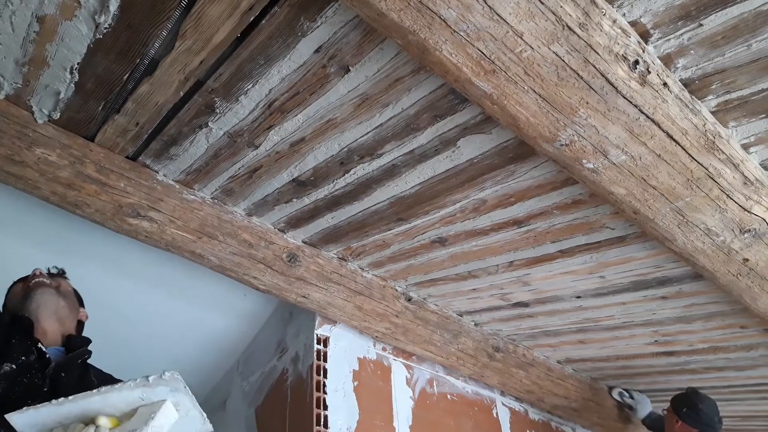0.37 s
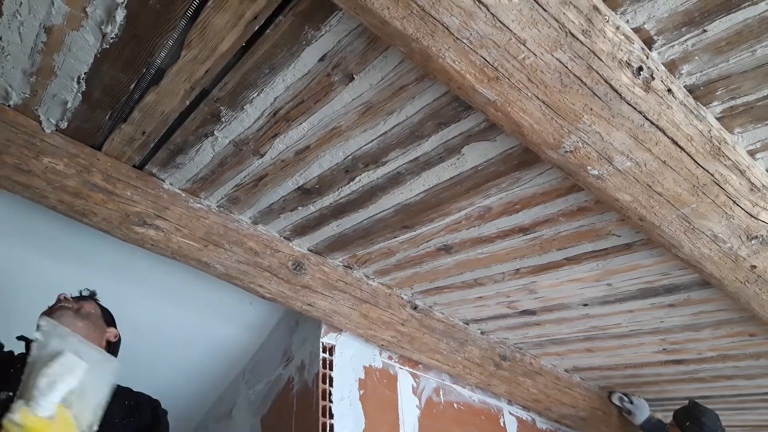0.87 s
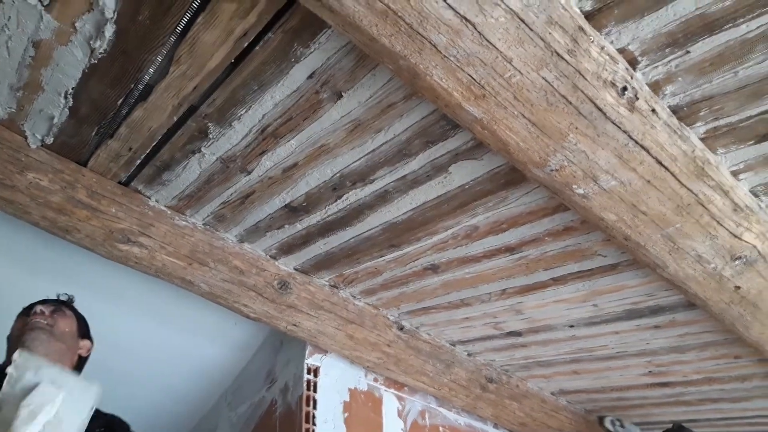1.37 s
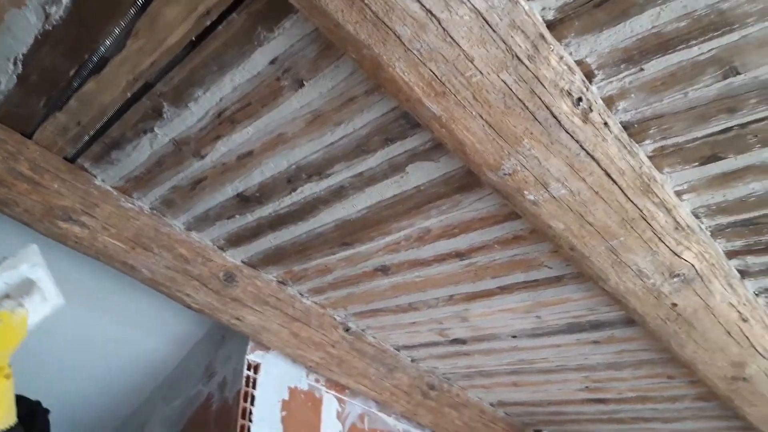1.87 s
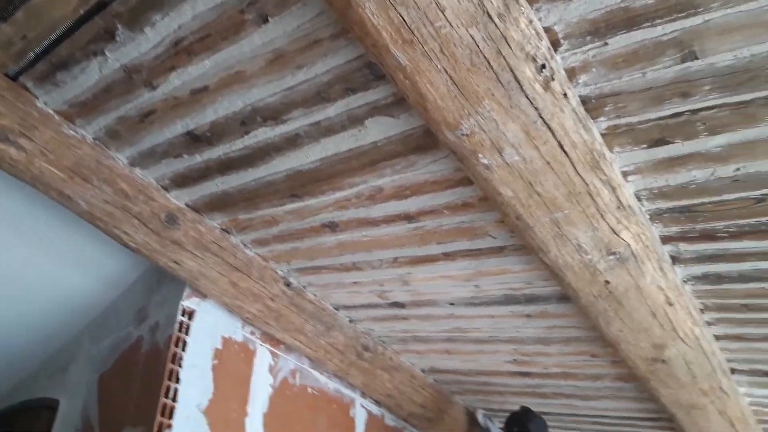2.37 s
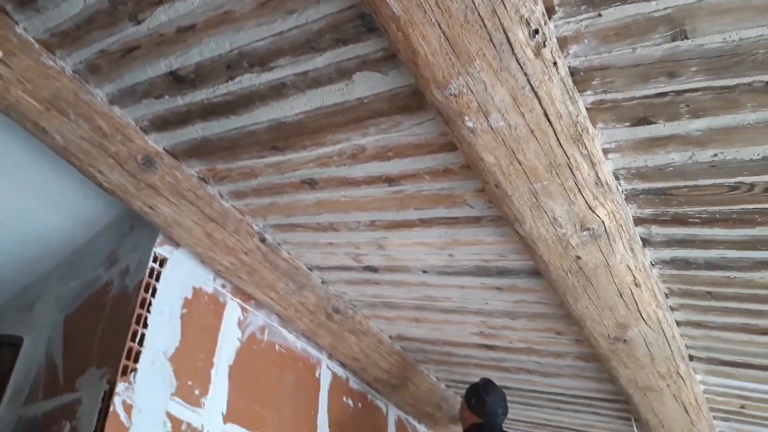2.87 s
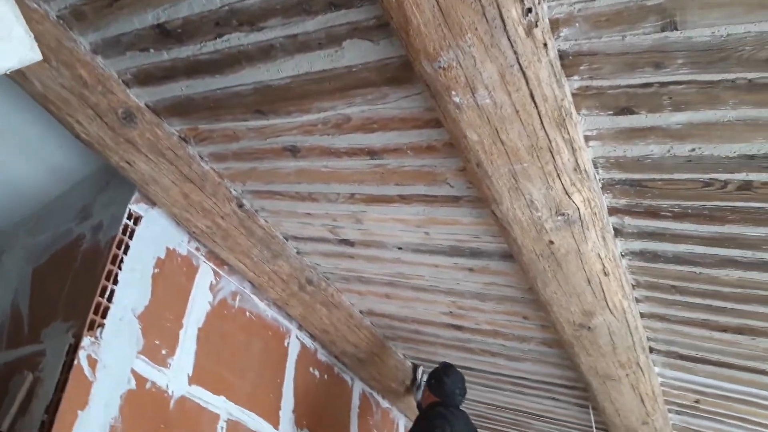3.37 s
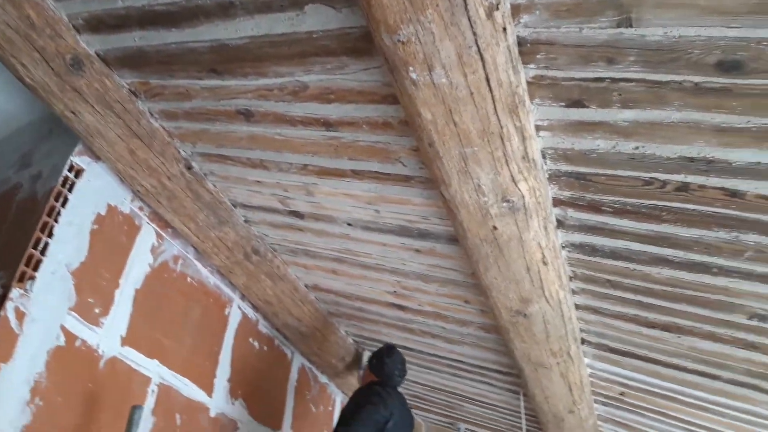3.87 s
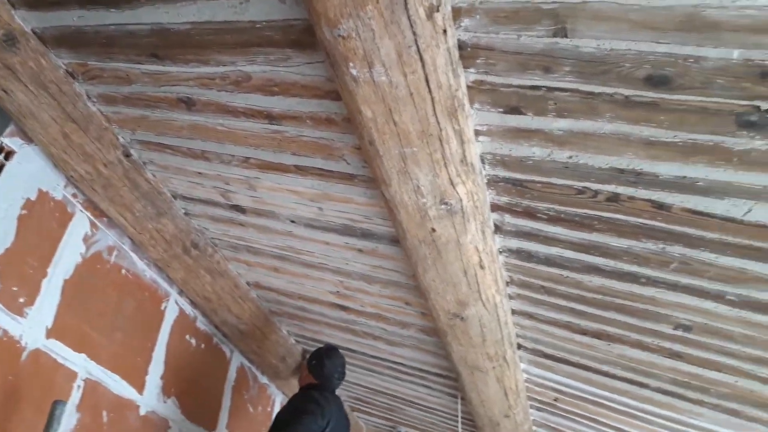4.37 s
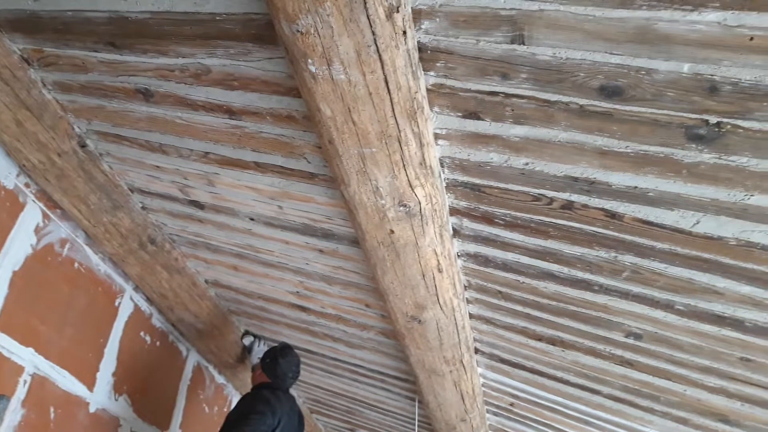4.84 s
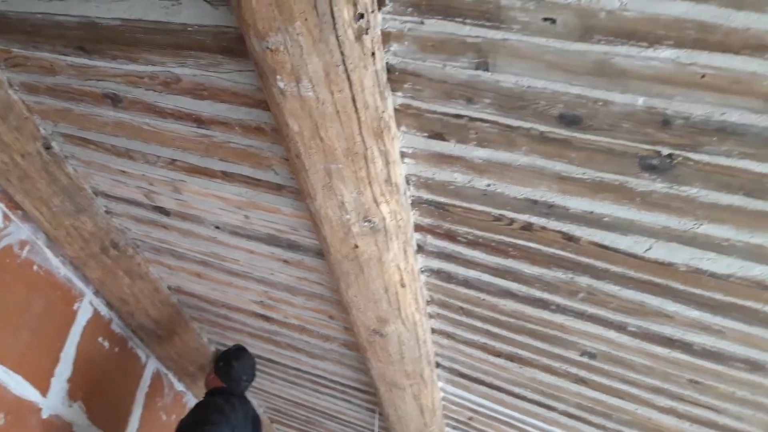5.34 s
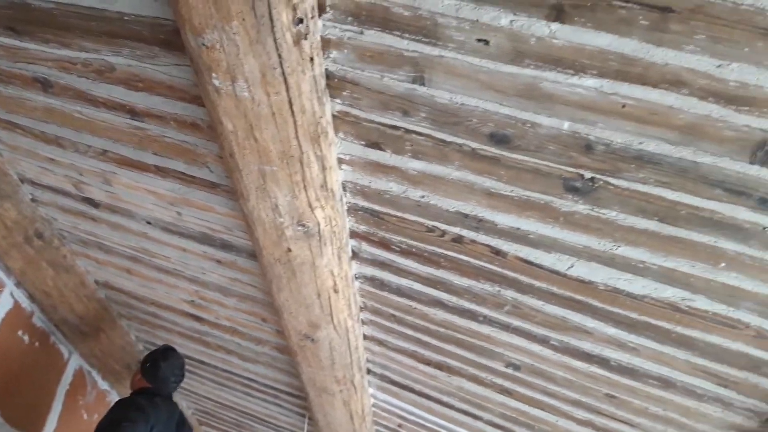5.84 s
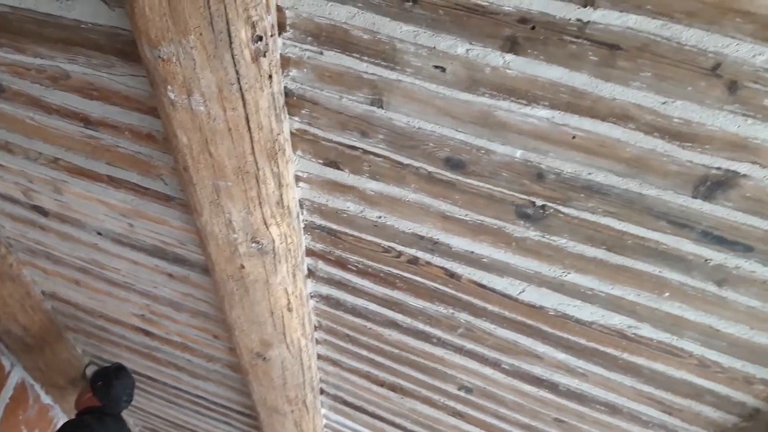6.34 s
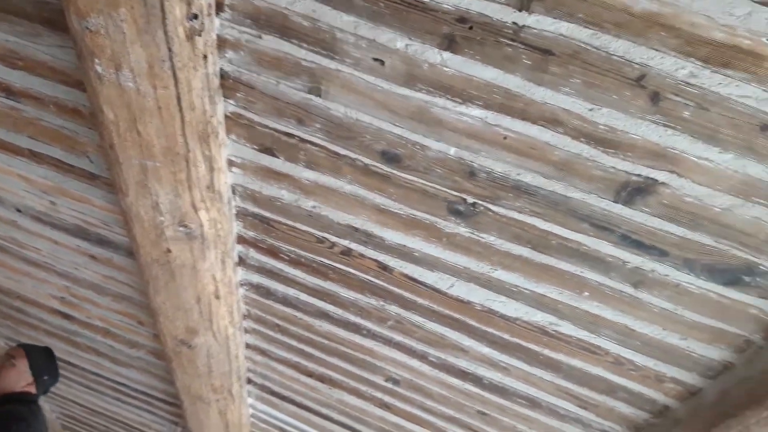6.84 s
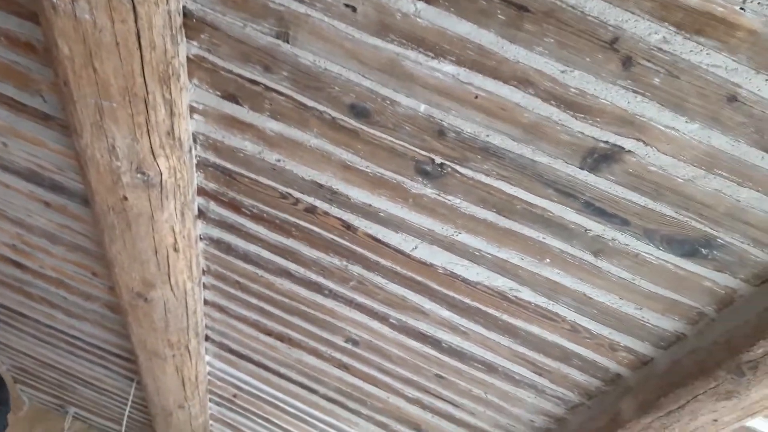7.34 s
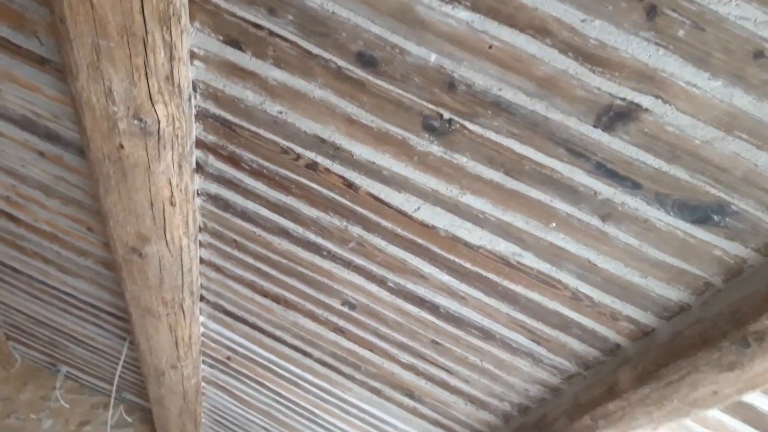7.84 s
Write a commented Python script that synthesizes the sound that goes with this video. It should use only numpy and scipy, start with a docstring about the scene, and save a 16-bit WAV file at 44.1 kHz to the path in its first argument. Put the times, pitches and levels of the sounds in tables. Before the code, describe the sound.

A bright, gritty scrape is already under way at 0 s as a trowel drags plaster along wooden ceiling boards. Short strokes follow closely, stuttering and sandy, with soft low knocks at 0.3, 0.5 and 0.7 s and a sharp snap at 0.5. A harder knock and click land at 1.15 s, then broader scrapes around 1.5 and 2.1. The loudest woody knock strikes at 2.5 s, followed by a full rubbing stroke at 2.7. Scraping swells again at 3.4-3.6 with a brief squeaky rub, then softens, hollow and rumbling, through 4-4.8. Strong gritty strokes return at 5.1 and 5.7 s. A crisp double knock comes at 6.05-6.12, coarser rubbing follows, and a bright snap with thin metallic tinkling at 6.9-7.2. It nearly quiets until 7.6, then closing scrapes and a sharp click at 7.8. Short bare-room tail, faint hush and low handling rumble throughout.

```python
"""A gritty scrape comes first: a trowel presses and drags plaster along the slats of a wooden ceiling; from
about 6.65 s another tool scrapes, without the blade's ring. Stick-slip friction makes shaped noise of grit, rub
and dust, and drives the resonant modes of the boards. Impacts of the tool ring the same boards, crumbs snap and
knocks crack, and the steel blade tinkles when touched; short noise bursts of narrow colour add brief rubs,
squeaks and hollow bodies of knocks."""
import sys
import numpy as np
from scipy import signal
from scipy.fft import rfft, irfft, next_fast_len
from scipy.io import wavfile
from scipy.ndimage import uniform_filter1d

SR = 44100
rng = np.random.default_rng(int(sys.argv[2]) if len(sys.argv) > 2 else 0)


def materialize(psi):
    """Save the field psi as 16-bit PCM at rate SR to the path in sys.argv[1].

    A 1-D psi becomes a single channel; in a 2-D psi each row is a channel.
    """
    bounded = np.clip(np.atleast_2d(psi).T, -1, 1)
    quanta = np.round(bounded * 32767).astype(np.int16)
    wavfile.write(sys.argv[1], SR, quanta)


def boost(x):
    """Linear amplitude factor 10**(x/20) for a level x in decibels (scalar or array-like)."""
    u = np.asarray(x, float) / 20
    return 10 ** u


N = 362061

# modes of the ceiling boards: (frequency [Hz], relative level [dB], decay time t60 under the scrape [s])
BOARDS = [(110.6, -5, 0.15), (168, 3.5, 0.073), (240.6, -1, 0.18), (272.7, 6, 0.045), (364, 5, 0.043),
          (440.4, 3.5, 0.079), (492, -0.5, 0.08), (560, -6.5, 0.049), (640, -5.5, 0.07), (768, 2.5, 0.083),
          (900, 3.5, 0.11), (1037, 1, 0.081), (1150, 1, 0.05), (1370, 2.5, 0.046), (1536, 1.5, 0.06),
          (1830, -6, 0.08), (4000, -4, 0.044)]
# strokes of the blade: (fastest at [s], speed-up [s], slow-down [s], grit level [dB],
# push on the boards against the grit [dB])
STROKES = [(0.052, 1, 0.16, -28, -8.5), (0.242, 0.086, 0.15, -36.5, -15), (0.33, 0.095, 0.094, -49, 12.5),
           (0.488, 0.014, 0.29, -37, -4), (0.697, 0.39, 0.24, -35.5, -7.5), (0.715, 0.024, 0.043, -43, 3),
           (0.877, 0.063, 0.049, -34, -14), (1.036, 0.094, 0.31, -29, -5), (1.17, 0.15, 0.049, -38.5, 7.5),
           (1.276, 0.79, 0.033, -38.5, -12), (1.412, 0.069, 0.045, -39, -4.5),
           (1.531, 0.094, 0.21, -30, -1), (1.715, 0.025, 0.13, -40, -6), (1.904, 0.0041, 0.098, -49, -3),
           (2.083, 0.125, 0.24, -30, -3.5), (2.302, 0.059, 0.068, -42, -4), (2.478, 0.1, 0.16, -44, -13),
           (2.718, 0.21, 0.33, -30.0, -0.5), (2.865, 0.11, 0.088, -31, -16),
           (2.995, 0.008, 0.048, -52, -12), (3.23, 0.2, 0.05, -47, -10), (3.263, 0.012, 0.13, -39, 3),
           (3.39, 0.11, 0.2, -34.5, 6), (3.529, 0.21, 0.16, -29, -9.5), (3.65, 0.011, 0.1, -41.5, 1),
           (3.824, 0.0083, 0.14, -41.5, 0.5), (3.961, 0.0032, 0.55, -42, -6),
           (4.098, 0.17, 0.12, -33.5, -2.5), (4.231, 0.0046, 0.21, -45, 7.5), (4.34, 0.123, 0.41, -60.5, 6),
           (4.79, 0.06, 0.057, -48, 5), (4.906, 0.13, 0.71, -37.5, -9), (5.116, 0.039, 0.22, -29, -4.5),
           (5.198, 0.031, 0.15, -31, -37), (5.528, 0.061, 0.042, -36, -5.5),
           (5.696, 0.21, 0.085, -29, -10.5), (5.82, 0.37, 0.39, -44, 3.5),
           (6.137, 0.098, 0.063, -34.5, 5.5), (6.292, 0.15, 0.24, -32.5, -10.5),
           (6.409, 0.22, 0.065, -35, -19), (6.54, 0.15, 1, -56, -8), (6.715, 0.01, 0.13, -35.5, -9),
           (6.924, 0.18, 0.09, -36, -18.5), (7.018, 0.0089, 0.15, -49, -10),
           (7.252, 0.07, 0.38, -59.5, -27), (7.46, 0.05, 0.5, -56, -12), (7.62, 0.08, 0.08, -49, -8),
           (7.685, 0.04, 0.12, -39, -12), (7.755, 0.07, 0.1, -34.5, -12), (7.87, 0.13, 0.14, -32.0, -21.5),
           (8.128, 0.15, 0.099, -50, 1)]
MIC_STEP_DB = -8  # the microphone port loses the top


def level(x, db):
    """Normalization: scale to an rms level in dB."""
    return x * boost(db) / np.sqrt(np.mean(x ** 2))


def on_log(points, hz):
    """Interpolation: read (Hz, value) points joined on a log-frequency axis."""
    at, value = np.transpose(points)
    return np.interp(np.log(np.maximum(hz, 1)), np.log(at), value)


def colour(x, points, rings=()):
    """Spectral shaping: relative density in dB and broad resonances, falling steeply below the first point."""
    size = next_fast_len(N)
    hz = np.arange(size // 2 + 1) * SR / size
    octaves_below = np.log2(np.maximum(points[0][0] / (hz + 1), 1))
    db = on_log(points, hz) - 48 * octaves_below
    db = db + sum(gain / (1 + (2 * (hz - f) / width) ** 2) for f, width, gain in rings)
    return level(irfft(rfft(x, size) * boost(db), size)[:N], 0)


def ring(x, hz, t60):
    """Damped resonance: one mode driven by x; a unit click peaks near 1, and no steady push passes."""
    radius = np.exp(-np.log(1000) / (t60 * SR))
    angle = 2 * np.pi * hz / SR
    return signal.lfilter([.5, 0, -.5], [1, -2 * radius * np.cos(angle), radius * radius], x)


def walk(rate):
    """Slow random modulation: normal values held 1 / rate s, then smoothed twice."""
    k = int(SR / rate)
    held = np.repeat(rng.standard_normal(N // k + 1), k)
    return uniform_filter1d(uniform_filter1d(held, k), k)[:N]


def grains(rate, spread_db):
    """Granular noise: random clicks of uneven but limited size, over the hiss of countless smaller ones."""
    hit = rng.random(N) < rate / SR
    size_db = spread_db * np.minimum(rng.exponential(size=N), 3)
    clicks = hit * rng.standard_normal(N) * boost(size_db)
    return level(clicks, 0) + 1.07 * rng.standard_normal(N)


def add(out, s, sound, peak_db):
    """Superposition: lay a sound into out at time s with a given peak."""
    i = int(s * SR)
    k = min(len(sound), N - i)
    out[i:i + k] += sound[:k] * boost(peak_db) / np.abs(sound).max()


def noise_burst(hz, spread, fade):
    """Transient noise: a burst in a band around hz, dying to 1/e in fade seconds; peak 1."""
    t = np.arange(int(.12 * SR)) / SR
    edges = np.clip([hz / spread, hz * spread], 300, .45 * SR)
    burst = rng.standard_normal(len(t)) * np.exp(-t / fade)
    burst = signal.sosfilt(signal.butter(2, edges, "band", fs=SR, output="sos"), burst)
    return burst / np.abs(burst).max()


def background_hush():
    """Stationary noise: a faint shaped hush whose level wanders slowly."""
    # (frequency [Hz], relative density [dB per Hz])
    hush_spectrum = [(18, -57), (30, 2.5), (118, 13.5), (540, -2), (1540, 13), (1960, -7.5), (3980, -7),
                     (8980, 7), (16000, -31)]
    return colour(rng.standard_normal(N), hush_spectrum) * boost(-65.5 + 1.6 * walk(1.3))


def room(x):
    """Reverberation: convolution with dense reflections, each octave decaying at its own rate."""
    # (frequency [Hz], decay time t60 [s])
    room_t60 = [(100, 0.98), (530, 0.5), (1400, 0.55), (3700, 0.49), (10000, 0.25)]
    t, tail = np.arange(int(.8 * SR)) / SR, 0
    for hz in 88 * 2 ** np.arange(8):
        sos = signal.butter(2, [hz / np.sqrt(2), hz * np.sqrt(2)], "band", fs=SR, output="sos")
        band = signal.sosfilt(sos, rng.standard_normal(len(t)))
        tail = tail + band * boost(-60 * t / on_log(room_t60, hz))
    tail = tail * (t > .004)  # no reflection arrives in the first 4 ms
    return signal.fftconvolve(x, tail / np.sqrt(np.sum(tail ** 2)))[:N]


def tinkles():
    """Modal excitation: uneven brushes ring the steel blade's modes near the touch."""
    # free blade: (frequency [Hz], decay time t60 before the grip damps it [s])
    blade_modes = [(1120, .04), (1520, .03), (1860, .035), (3200, .03), (4150, .06), (5380, .09),
                   (6200, .04), (7250, .02), (8050, .05), (8620, .09), (9275, .07), (10840, .07),
                   (11100, .06), (11530, .07), (13600, .04)]
    # light brushes of the blade: (time [s], peak level [dB], centre [Hz], fade to 1/e [s])
    touch_events = [(0.249, -32, 6100, 0.037), (0.721, -28, 1067, 0.012), (1.819, -43, 8800, 0.086),
                    (1.889, -46, 5430, 0.031), (1.922, -37, 4150, 0.043), (3.259, -27.5, 4150, 0.0085),
                    (3.959, -32, 4120, 0.0081), (3.963, -32.5, 1860, 0.0054), (4.36, -47, 1540, 0.43),
                    (5.2, -32.5, 1860, 0.032), (5.69, -30, 1860, 0.048), (6.4, -39.5, 1860, 0.13),
                    (6.52, -46, 3200, 0.14), (7.03, -36, 13700, 0.056), (7.023, -35.5, 5840, 0.038),
                    (7.03, -41, 11530, .03), (7.045, -39.5, 8900, 0.076), (7.11, -48, 10700, 0.038),
                    (7.225, -46, 11100, 0.045), (7.249, -44, 7350, 0.029)]
    grip_damps = 0.89  # the hand on the handle shortens the ring to this share
    out, t = np.zeros(N), np.arange(int(.4 * SR)) / SR
    for s, db, centre_hz, fade in touch_events:
        brush = rng.standard_normal(len(t)) * np.exp(-t / fade) * (t < 2.5 * fade)
        brush = brush * boost(3.7 * walk(90.0)[:len(t)])
        sound = 0
        for hz, t60 in blade_modes:
            reach = boost(-120 * abs(np.log2(hz / centre_hz)))  # 120 dB weaker per octave away
            sound = sound + reach * ring(brush, hz, grip_damps * t60)
        add(out, s, sound, db)
    return out


def narrow_bursts():
    """Band-limited noise: short bursts of narrow colour, as brief rubs, squeaks and hollow bodies of knocks."""
    # (time [s], peak level [dB], centre [Hz], fade to 1/e [s])
    burst_events = [(2.43, -38.5, 1310, 0.091), (2.454, -37, 2590, .02), (3.636, -26, 2600, .01),
                    (3.655, -28, 2100, 0.011), (3.793, -39, 2208, 0.01), (4.73, -39.5, 626, 0.12),
                    (4.773, -34.5, 2020, 0.012), (5.808, -32, 2510, 0.022), (6.03, -36, 564, .04),
                    (6.018, -38, 3400, .01), (6.716, -28, 790, .03), (6.858, -33, 1400, .015),
                    (7.593, -42, 2910, 0.027), (7.748, -27, 1130, .015), (7.895, -28.5, 1046, 0.027)]
    out = np.zeros(N)
    for s, db, hz, fade in burst_events:
        add(out, s, noise_burst(hz, 1.15, fade), db)
    return out


def snaps():
    """Brittle fracture: a sharp wide click, then a moment of crumbling in its own colour; most are dry crumbs
    breaking, some sharpen the crack of a knock."""
    # (time [s], peak level [dB], centre [Hz])
    snap_events = [(0.4983, -14, 4360), (0.684, -19, 8970), (0.703, -17, 4750), (1.1415, -15, 3000),
                   (1.287, -22, 2980), (1.9032, -26, 4110), (2.537, -19, 3870), (3.0115, -28.5, 7430),
                   (3.134, -43, 8000), (3.8232, -20.5, 2600), (3.961, -32, 4000), (4.233, -21, 4640),
                   (4.497, -32, 8900), (4.943, -22, 4600), (5.1, -24, 4630), (5.14, -18, 5000),
                   (5.921, -28, 3300), (6.0573, -18.5, 3600), (6.1215, -14, 4400), (6.714, -19, 3150),
                   (6.9352, -13, 8650), (7.042, -38, 8000), (7.8177, -12, 5070)]
    out = np.zeros(N)
    for s, db, hz in snap_events:
        click = 0.84 * noise_burst(3 * hz, 3.5, .0005) + noise_burst(hz, 1.84, 0.0014)
        tail = 0.24 * noise_burst(hz, 1.1, .01)
        add(out, s, click + tail, db)
    return out


def knocks():
    """Impact: a blow rings the board modes, most near its hardness, with a thud of noise that rattles on."""
    # knocks of the tool on wood: (time [s], peak level [dB], hardness [Hz], rattle fade to 1/e [s])
    knock_events = [(0.277, -24.5, 257, 0.052), (0.489, -21.5, 238, 0.044), (0.707, -24.5, 267, 0.028),
                    (1.143, -14, 1350, 0.015), (1.286, -24, 1530, .03), (1.491, -17.5, 1000, 0.066),
                    (1.923, -18.5, 330, 0.062), (2.103, -20, 905, .03), (2.5358, -5, 1150, 0.055),
                    (3.278, -20, 369, 0.036), (3.636, -22, 264, 0.046), (3.823, -32.5, 243, 0.052),
                    (4.006, -25, 226, 0.038), (4.23, -34, 510, 0.067), (4.867, -26, 207, 0.041),
                    (5.429, -39, 284.7, 0.05), (6.058, -19, 805, .03), (6.1213, -12, 900, 0.019),
                    (6.714, -24, 815, 0.07), (7.668, -32, 960, .03), (8.155, -38.5, 200, 0.044),
                    (8.188, -34, 560, .04)]
    out, t = np.zeros(N), np.arange(int(.3 * SR)) / SR
    for s, db, hard_hz, rattle in knock_events:
        fading = np.exp(-t / rattle)
        blow = 0.059 * rng.standard_normal(len(t)) * fading
        blow[0] = 1
        place_db = 2.5 * rng.standard_normal(len(BOARDS))  # each blow favours other modes
        body = 0
        for (hz, mode_db, t60), favour_db in zip(BOARDS, place_db):
            tilt_db = mode_db - 9 * abs(np.log2(hz / hard_hz))
            body = body + boost(favour_db + tilt_db) * ring(blow, hz, 0.47 * t60)
        low_hz = hard_hz / 2.55
        bright = signal.butter(3, [low_hz, hard_hz * 1.5], "band", fs=SR, output="sos")
        dull = signal.butter(3, [low_hz, hard_hz * 1.15], "band", fs=SR, output="sos")
        # the first contact is a hard crack, the rattle after it is weaker and duller
        noise = rng.standard_normal(len(t))
        crack = 13 * (t == 0) + 2.0 * noise * np.exp(-t / 0.0016)
        thud = signal.sosfilt(bright, crack) + signal.sosfilt(dull, noise * fading)
        # wood gives a little, so the push lasts a moment and the highest pitches stay weak
        push = np.hanning(int(.0004 * SR))
        add(out, s, np.convolve(level(body, 0) + level(thud, 0.77), push), db)
    return out


def scratches(rate):
    """Random contact: larger grains caught under the blade leave short scratches of their own colours."""
    out = np.zeros(N)
    for at, pitch, size, last in rng.random((int(rate * N / SR), 4)):
        scratch = noise_burst(600 * 15 ** pitch, 1.203, 0.0022 + 0.017 * last)
        add(out, at * N / SR, scratch, 14 * size)
    return level(out, 0)


def strokes(over_db, lingers=1):
    """Power addition: level in time of all strokes, each raised by over_db and widened by lingers."""
    swing_db = 20  # how far a stroke sinks over its widened speed-up and slow-down times
    swing_bend = 1.7  # 1 = pointed stroke, 2 = round stroke
    t, power = np.arange(0, N, 64) / SR, 1e-12
    for (s, up, down, db, _), over in zip(STROKES, over_db):
        away = np.where(t < s, (s - t) / up, (t - s) / down) / lingers
        power = power + boost(db + over - swing_db * away ** swing_bend) ** 2
    return np.interp(np.arange(N) / SR, t, 10 * np.log10(power))


def patchy(x):
    """Independent band modulation: uneven plaster lets every half octave flicker on its own."""
    size = next_fast_len(N)
    spectrum = rfft(x, size)
    octave = np.log2(np.arange(size // 2 + 1) * SR / size + 1)
    centres = np.log2(500) + np.arange(10) / 2
    place = np.clip(octave, centres[0], centres[-1])
    out = 0
    for centre in centres:
        share = np.maximum(1 - 2 * abs(place - centre), 0)  # triangles that add up to 1
        out = out + irfft(spectrum * share, size)[:N] * boost(2 * walk(30))
    return out


def slip_flutter():
    """Stick-slip: the blade catches and lets go, each slip a sudden burst that dies away."""
    slips_per_s, slip_s, slip_depth = 110, .003, .6
    slips = (rng.random(N) < slips_per_s / SR) * rng.random(N)
    slips = signal.lfilter([1], [1, -np.exp(-1 / (slip_s * SR))], slips)
    return boost(1.8 * walk(25)) * level(1 + slip_depth * slips, 0)


def board_rumble():
    """Forced vibration: judder drives the low board modes, and the place on the boards favours some."""
    # pitch favoured by the place on the boards: (time [s], frequency [Hz])
    place_path = [(0, 150), (.9, 164), (1.298, 260), (1.55, 393), (1.8, 243), (2.12, 430), (2.35, 252),
                  (2.78, 396), (3.15, 260), (3.42, 396), (3.65, 256), (4.4, 239), (4.748, 413), (5, 209),
                  (5.6, 182), (5.8, 238), (6.5, 240), (6.8, 483), (7.9, 486), (8.2, 306)]
    db_per_octave = -10.5  # modes away from the favoured pitch
    judder = grains(1500, spread_db=2.5)
    place_hz = np.interp(np.arange(N) / SR, *np.transpose(place_path))
    rumble = 0
    for hz, db, t60 in BOARDS:
        if hz < 700:
            drive_db = 3.0 * walk(4.01) + db_per_octave * abs(np.log2(hz / place_hz))
            rumble = rumble + boost(db) * ring(judder * boost(drive_db), hz, t60)
    return level(rumble, 0)


def scrape():
    """Sliding friction: sand under the blade makes grit, finer dust and a coarser rub, and rumbles the boards."""
    # spectra: (frequency [Hz], relative density [dB per Hz])
    grit_spectrum = [(2200, -7), (3200, 1), (4600, 3), (5600, -2), (7000, -2), (9400, 1), (12000, -50.5)]
    rub_spectrum = [(400, -5.5), (700, -0.5), (1100, 5), (1600, 6.5), (2300, 1.5), (3500, -7.5)]
    dust_spectrum = [(10000, -1), (12000, 6.5), (15500, 2)]
    # broad resonances of the blade: (frequency [Hz], width [Hz], gain over the grit [dB])
    grit_resonances = [(4200, 350, 14.5), (2450, 810, -1.5), (6870, 860, 14.5), (8970, 680, 14.5)]
    # grip and contact: (time [s], how freely the blade sings [0-1], coarseness [dB]); from about 6.65 s another
    # tool scrapes, with no ring and a coarser rub
    contact_path = [(0, 0.85, -2.5), (.66, 0.5, 1), (.8, 1, -1.5), (1.08, 0.9, -2.5), (1.24, 0.4, 3),
                    (1.45, 0.8, -4.5), (2.101, 0.84, 0.5), (2.5, 0.16, 3), (2.8, 0.97, -8), (3.1, 0.2, -8),
                    (3.5, 0.6, -5), (4.1, 0.5, 2), (4.6, 0.24, 3), (5.2, 0.6, 0.5), (5.698, 0.58, -1.5),
                    (6.1, 0, 4.5), (6.35, 1, -5), (6.65, 0.1, 7.5), (6.95, 0.03, 8.5), (7.35, 0.1, -5.5),
                    (7.7, 0.03, 10)]
    s, sing, coarse_db = np.transpose(contact_path)
    sing, coarse_db = (np.interp(np.arange(N) / SR, s, c) for c in (sing, coarse_db))
    push_db = np.array(STROKES)[:, 4]
    grit_db = strokes(0 * push_db)
    # faster blades raise more dust, 8 dB under a grit level of -28.5 dB; a coarser contact gives less
    dust_db = grit_db - 8 + 0.2 * (grit_db + 28.5) - 0.41 * coarse_db
    # the rub grows with the push and outlasts the grit
    rub_db = strokes(-4.5 + 0.34 * push_db, 1.045) + coarse_db
    # the boards feel the push before and after the blade is fast
    rumble_db = strokes(push_db, 1.073)
    flutter = slip_flutter()  # shared by all layers
    sand = grains(9000, spread_db=2.5)
    # a changing grip damps the blade's broad resonances more or less
    free = np.clip(sing + 0.28 * walk(12), 0, 1)
    singing_grit = colour(sand, grit_spectrum, grit_resonances)
    damped_grit = colour(sand, grit_spectrum)
    grit = free * singing_grit + (1 - free) * damped_grit + boost(-13) * scratches(90)
    # raised to make up for the loss at the microphone port
    dust = boost(-MIC_STEP_DB) * colour(sand, dust_spectrum)
    rub = colour(grains(2500, spread_db=2.5), rub_spectrum) * boost(0.48 * walk(13))
    surface = patchy(boost(grit_db) * grit + boost(rub_db) * rub)
    return flutter * (surface + boost(dust_db) * dust + boost(rumble_db) * board_rumble())


def scene():
    """Superposition: direct tool sounds and the room's tail, over the hush."""
    work = scrape() + knocks() + snaps() + narrow_bursts() + tinkles()
    return (work + boost(-12) * room(work) + background_hush())[None]


def band_limit(x):
    """A steep low-pass at the top of the band."""
    return signal.sosfilt(signal.butter(12, 16890, fs=SR, output="sos"), x)


def record(dry):
    """Linear filtering: the phone thins the bass and the top, picks up the hand and cuts the highest band."""
    x = signal.sosfilt(signal.butter(2, 97, "high", fs=SR, output="sos"), dry)
    dull = signal.sosfiltfilt(signal.butter(8, 8950, fs=SR, output="sos"), x)
    x = dull + boost(MIC_STEP_DB) * (x - dull)
    # low rumble of the hand that holds the phone
    hand = signal.sosfilt(signal.butter(2, [38, 90], "band", fs=SR, output="sos"), rng.standard_normal(N))
    x = x + level(hand * boost(1.6 * walk(3.2)), -73.5)
    x = signal.sosfilt(signal.ellip(8, .2, 70, 15800, fs=SR, output="sos"), x)
    return band_limit(x)


dry = scene()
out = record(dry)
materialize(out)
```